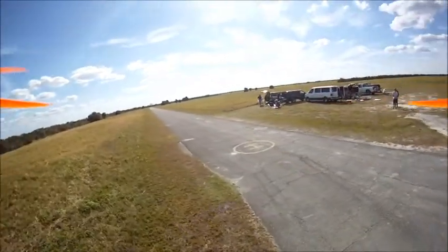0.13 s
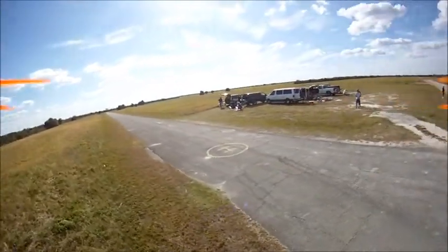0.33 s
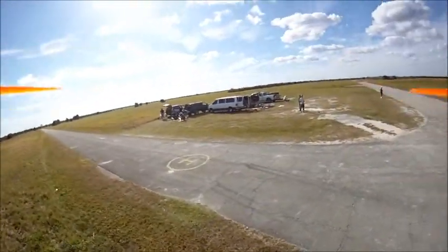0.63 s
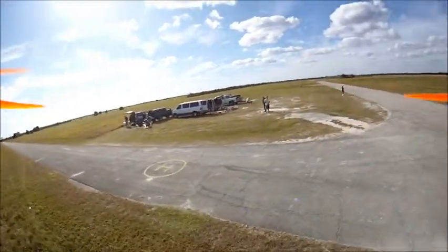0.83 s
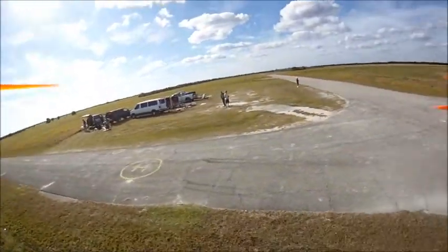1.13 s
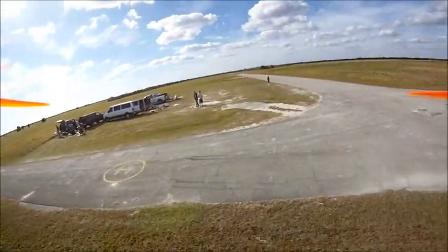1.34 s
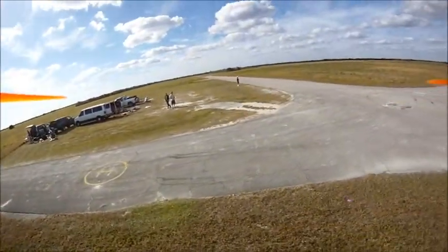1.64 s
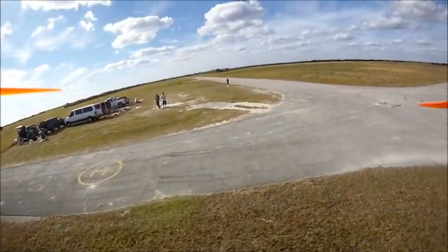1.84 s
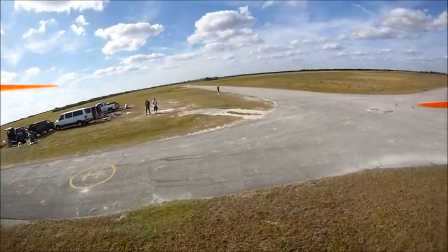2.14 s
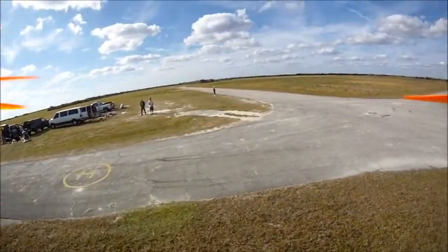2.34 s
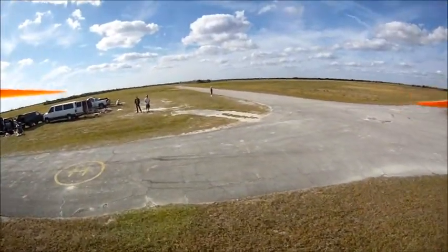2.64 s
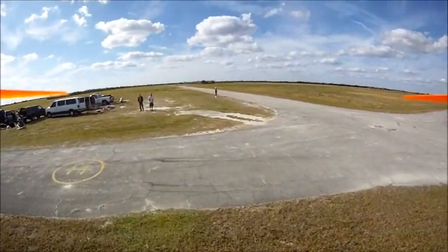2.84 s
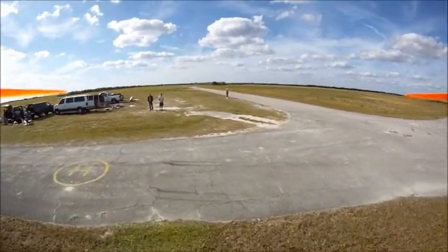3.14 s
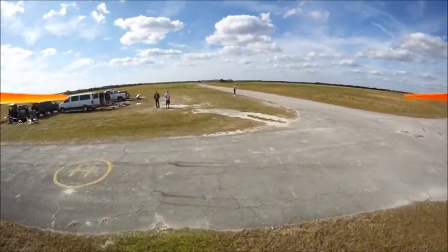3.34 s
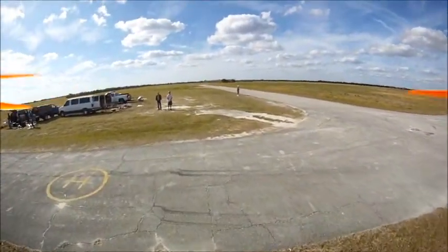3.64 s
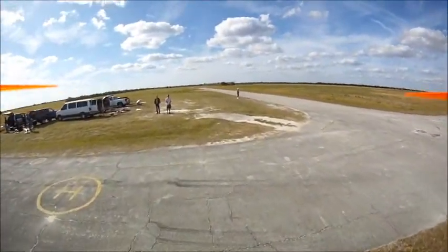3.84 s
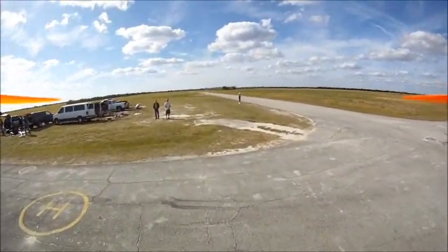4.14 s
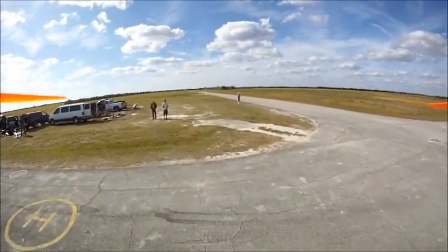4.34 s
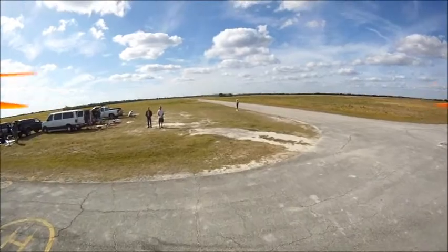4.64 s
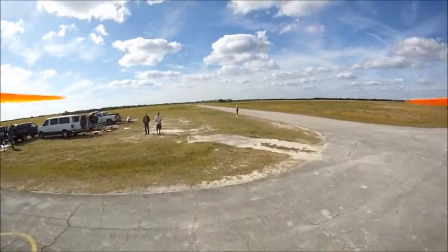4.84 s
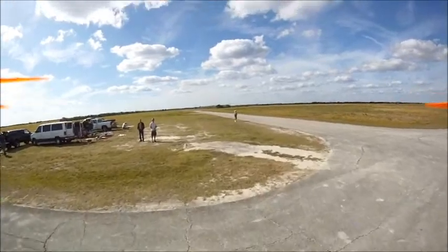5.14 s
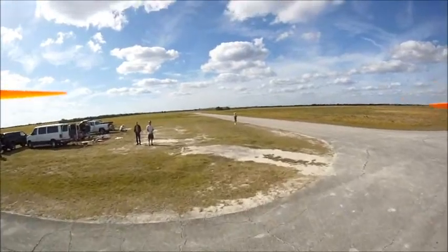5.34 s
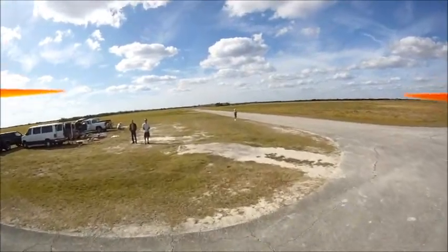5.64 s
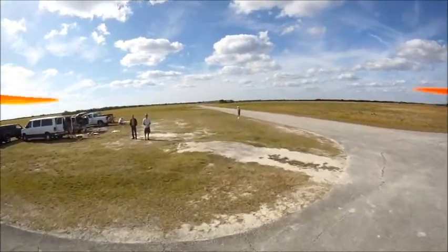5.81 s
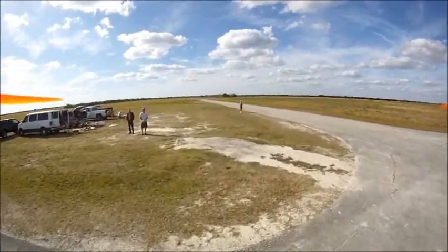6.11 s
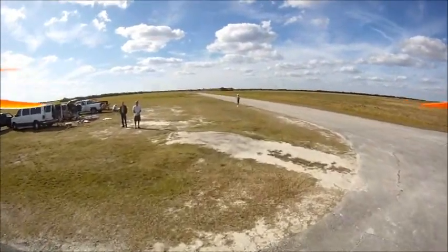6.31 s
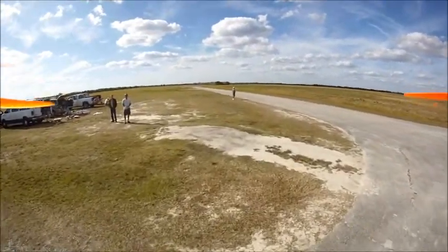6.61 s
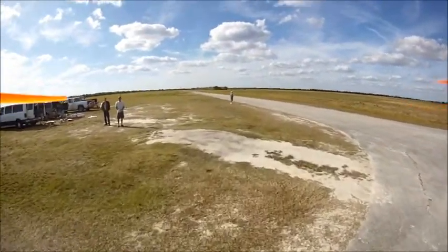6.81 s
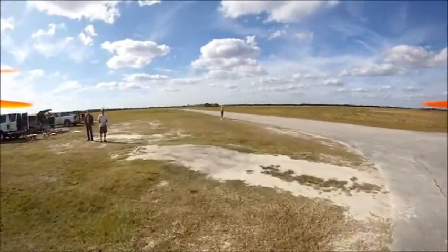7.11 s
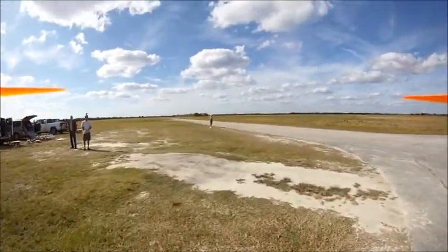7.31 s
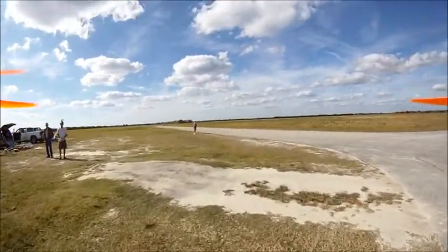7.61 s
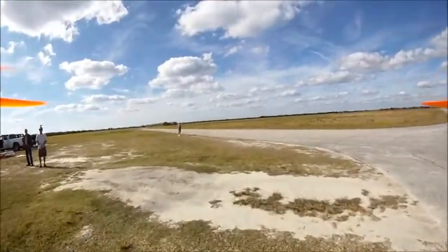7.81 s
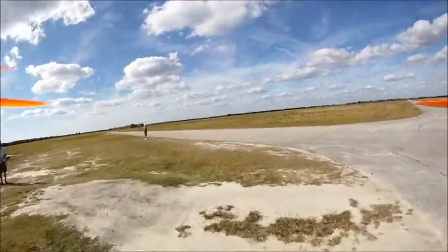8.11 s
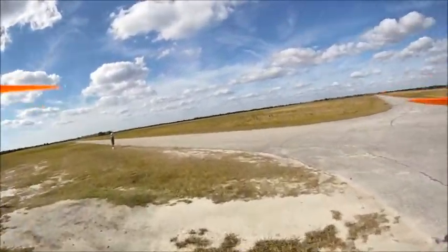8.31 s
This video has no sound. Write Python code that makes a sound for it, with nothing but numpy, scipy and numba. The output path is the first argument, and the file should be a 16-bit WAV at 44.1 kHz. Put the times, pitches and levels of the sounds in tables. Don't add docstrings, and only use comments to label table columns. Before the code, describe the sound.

Small drone rotors buzz and beat unevenly with a thin metallic whine and hiss, while wind gusts thump the microphone harder and harder.

```python
import sys
import numpy as np
from scipy import signal
from scipy.fft import rfft, irfft, next_fast_len
from scipy.io import wavfile
from scipy.ndimage import uniform_filter1d
from numba import njit

SR = 44100
rng = np.random.default_rng(int(sys.argv[2]) if len(sys.argv) > 2 else 0)


def level_to_linear(level):
    exponent = np.asarray(level, float) / 20
    return 10 ** exponent


def store_pcm(level_fs):
    pcm = np.round(np.clip(level_fs, -1, 1) * 32767).astype(np.int16)
    wavfile.write(sys.argv[1], SR, np.atleast_2d(pcm).T)


N = 373086
TIME = np.arange(N) / SR
SWITCH_HZ = 8000
CONVERTER_HZ, OUTPUT_HZ = 12000, 48000
TURN_S, TURN_LENGTH_S = 3.4, 0.2
EARLY_FAINT_DB = -5
PULL_UP_S, PULL_UP_LENGTH_S, EASED_DB = 7.77, 0.22, -2.5
RUMBLE_DB, RUMBLE_SLOPE, RUMBLE_LAG_S, CALM_DB = -36, 0.7, 0.46, -35.5
HISS_DB = -48.5

# (time [s], level [dB])
BREEZE = [(0.0, -52), (0.3, -46), (1.23, -45.5), (1.32, -26.5), (1.42, -41.5), (1.72, -39), (1.86, -33),
          (2.05, -40.5), (2.55, -32), (2.72, -40), (2.85, -27.5), (3.35, -30.5), (3.93, -32), (4.07, -36),
          (4.5, -29), (6.17, -32.5), (7.6, -30), (8.46, -28.5)]
# (time [s], length [s], change [dB])
GUSTS = [(1.45, 0.033, 3), (1.6, 0.12, 0.5), (2.663, 0.023, 8), (3.4, .04, 0), (3.9, 0.087, 1),
         (4.5, 0.14, 4), (4.9, 0.063, 2), (5.193, .08, 5), (5.995, 0.15, 6), (6.45, 0.085, 1.5),
         (7.31, 0.091, 4), (8.106, 0.16, -3.5)]
# (frequency [Hz], level [dB])
RUMBLE_COLOUR = [(15, -33), (30, -24.5), (60, -5.5), (110, -5.5), (200, -9), (500, -54)]
# (frequency [Hz], level [dB])
BURST_COLOUR = [(40, -1), (100, -1), (180, 1.5), (300, 1), (480, -5.5), (800, -15.5), (1500, -25.5),
                (3000, -42)]
# (time [s], push 1 or pull -1, peak [dB], frequency [Hz])
THUMPS = [(1.327, -1.0, -16, 427), (1.437, 1.0, -13, 178), (1.538, -1.0, -8, 131), (1.799, 1.0, -4.5, 233),
          (1.866, -1.0, -12.5, 210), (2.643, 1.0, -21, 276), (2.923, 1.0, -13, 229), (3.237, 1.0, -8, 198),
          (3.4, -1.0, -4.5, 174), (3.487, -1.0, -9, 255), (3.555, -1.0, -11, 207), (3.811, -1.0, -12, 252),
          (4.005, -1.0, -6, 125), (4.382, -1.0, 2.5, 126), (4.817, 1.0, -7, 187), (4.944, -1.0, -2, 242),
          (5.031, -1.0, -3, 119), (5.2, 1.0, -7.5, 136), (5.587, 1.0, -9, 189), (5.805, 1.0, -6, 200),
          (5.981, -1.0, -5, 210), (6.213, -1.0, -12, 135), (6.691, 1.0, -12, 215), (6.888, 1.0, -5.5, 267),
          (7.254, -1.0, -7, 215), (7.385, 1.0, -8.5, 304), (7.542, 1.0, -10, 213), (7.842, 1.0, -13, 252),
          (8.032, 1.0, -9.5, 134)]
# (time [s], length [s], change [dB])
BITES = [(0.0, 0.024, 2), (0.403, 0.57, 0), (1.42, 0.049, 4.5), (3.86, 0.18, 4.5), (4.233, 0.043, 3.5),
         (4.76, 0.33, 3), (7.0, 0.95, 4.5), (7.657, 0.19, 1.5), (2.707, 0.071, -2.5), (5.302, .3, 3),
         (6.756, 0.18, -2.5)]
# (frequency [Hz], level [dB])
FRAME_COLOUR = [(290, -31), (500, 1), (543, -7.5), (596, -4.5), (771, -8), (1180, -1), (1350, -4.5),
                (1530, -6.5), (1760, -11.5), (3080, -9), (4420, -2.5), (5050, -8.5), (5900, -19.5),
                (7670, -74), (13000, -120)]
# (frequency [Hz], width [Hz], lift [dB])
FRAME_RINGS = [(845, 12, 3.5), (1173, 90, 5), (1491, 102, 8.5), (3500, 50, 1.5), (4590, 1900, 4),
               (4820, 91, 3)]
FAINT_TONES = [(0, 11), (0, 12), (0, 14), (0, 18), (0, 28), (0, 36), (0, 42), (0, 56), (1, -28), (1, -56)]
# (near [dB], slow [dB], far [dB])
FAINT_DB = [(-16, -8.5, 5), (-33, -3, -13), (-3, -7, 0), (-21, -34, -5), (-23, -6, -10), (-7.5, -5.5, -15),
            (-37, -8, -31), (-6, -27, -11), (1, -26, -18), (-33, -9.5, -6)]
STRONG_TONES = [
    (0, 0, 42),
    (2, 0, 56),
    (0, 1, -42),
    (0, 0, 13),
    (1, 1, -42),
    (2, 0, 42),
]
# (level off resonance [dB], frequency [Hz], width [Hz], lift [dB], change before the turn [dB])
MOUNT_RINGS = [(-67.5, 3397, 830, 20.5, 2.5), (-68.5, 5110, 380, 9.5, 14.5), (-67.5, 4440, 660, 23.5, 1.5),
               (-57.5, 1165, 24, 5, 1.5), (-55.5, 4700, 400, 8.5, 0.5), (-63, 3730, 360, 10, -14)]
# (time [s], speed [Hz])
NEAR_SPEED = [(0.0, 91.8), (0.15, 89.8), (1.05, 89.7), (2.3, 89.8), (2.68, 93.1), (2.86, 93), (3.0, 90.9),
              (3.57, 84.9), (4.05, 87.9), (4.28, 86.5), (4.62, 83), (5.3, 83.6), (5.88, 86.2), (6.13, 80.6),
              (6.85, 81), (7.38, 81.9), (7.56, 86.4), (8.46, 83.3)]
# (time [s], speed [Hz])
SLOW_SPEED = [(0.0, 86.2), (0.23, 83.4), (0.57, 82.8), (0.8, 78.8), (1.1, 74.5), (1.72, 72.6), (2.07, 79.3),
              (2.4, 82.2), (2.85, 76.7), (3.07, 76.6), (3.5, 83), (4.33, 81.2), (4.65, 76.4), (5.52, 77.3),
              (5.85, 71.8), (6.8, 71.7), (7.8, 81), (8.4, 71.8)]
# (time [s], speed [Hz])
FAR_SPEED = [(0.0, 92), (0.15, 89.9), (0.7, 88.1), (1.5, 88.2), (1.6, 89.6), (2.3, 89.8), (2.68, 93.1),
             (2.86, 93), (3.35, 88), (3.85, 91), (4.2, 90.8), (4.42, 86.5), (4.62, 89.8), (5.55, 89.6),
             (5.72, 85.6), (6.9, 85.5), (7.45, 87.5), (7.8, 92.5)]
# (time [s], length [s], near [Hz], slow [Hz], far [Hz])
TRIMS = [(0.8, .17, -4.7, 0, 0), (0.93, .06, 0, 1.1, 0), (1.1, .1, 0, 0, 2.4), (1.39, .12, -7.8, 7.6, .8),
         (1.8, .06, .6, -1, 1.7), (2.23, .07, 0, -1.2, 0), (2.6, .08, 0, 1.4, 0), (3.68, .06, .9, -.6, 0),
         (4.07, .09, 0, -2.6, 0), (4.43, .09, -5.9, -.7, 0), (5.02, .06, -.8, -1, 0),
         (5.14, .06, 1.4, 1.4, -1.2), (5.3, .08, -.3, -1.2, 0), (5.47, .04, .4, 0, -.7),
         (5.88, .05, .3, .3, .7), (6.16, .08, -.4, 2.3, .3), (6.26, .06, .9, .5, -1.4),
         (6.42, .08, 1, -1.4, .9), (6.57, .06, .9, -.6, -1), (7.08, .13, -5.2, 2.8, 5),
         (7.37, .09, 0, -2.8, 0), (5.69, .05, .8, 0, 0), (7.95, .13, -.3, 2.4, 0), (8.06, .09, -2.6, 0, 0)]
ROTOR_ORDERS = [1, 2, 3, 4, 6, 8]
# (near [dB], slow [dB], far [dB])
ROTOR_DB = [
    (-14.5, -14.5, -6),
    (0, -1.5, 3),
    (-30, -32, -25),
    (-7, -13.5, -11),
    (-19, -32, -15),
    (-41.5, -37, -27),
]
FLUTTER_DB = [5.0, .8, 3.0, 1.2, 2.5, 3.0]
# (near [dB], slow [dB], far [dB])
LOAD_DB = [
    (-24.5, -29.5, -41),
    (-24.5, -28.5, -35.5),
    (-25.5, -37, -29),
]


def level(x, db):
    return x * level_to_linear(db) / np.sqrt(np.mean(x ** 2))


def curves(table):
    s, *columns = np.transpose(table)
    return np.array([np.interp(TIME, s, column) for column in columns])


def bumps(s, length_s):
    return np.exp(-((TIME - s) / length_s) ** 2)


def hump(hz, ring_hz, width_hz, lift_db):
    return lift_db / (1 + (2 * (hz - ring_hz) / width_hz) ** 2)


def colour(x, points, rings=()):
    size = next_fast_len(N)
    hz = np.arange(1, size // 2 + 2) * SR / size
    points_hz, points_db = np.transpose(points)
    db = np.interp(np.log(hz), np.log(points_hz), points_db)
    for ring in rings:
        db = db + hump(hz, *ring)
    return irfft(rfft(x, size) * level_to_linear(db), size)[:N]


def walk(rate_hz):
    hold = int(SR / rate_hz)
    draws = rng.standard_normal(400)
    held = np.repeat(draws[np.arange(N // hold + 1) % 400], hold)
    return 1.3 * uniform_filter1d(uniform_filter1d(held, hold), hold)[:N]


def wind(wind_db, rumble_db, eddy_db=1.5, burst_db=3.2, rumble_share=0.4):
    eddies_db = eddy_db * walk(11) + burst_db * walk(50)
    rumble = colour(level_to_linear(rumble_share * eddies_db) * rng.standard_normal(N), RUMBLE_COLOUR)
    bursts = colour(level_to_linear(eddies_db) * rng.standard_normal(N), BURST_COLOUR)
    return level_to_linear(rumble_db) * level(rumble, 3.96) + level_to_linear(wind_db) * level(bursts, 4.6)


def thumps(width_cycles=0.3, crackle_db=-12):
    out = np.zeros(N)
    crackle = colour(rng.standard_normal(N), [(200, 1.5), (600, -1.0), (1100, -16.5), (2500, -28)])
    ragged = level(crackle, crackle_db)
    around = np.arange(-800, 800)
    for s, push, db, hz in THUMPS:
        cycles = around / SR * hz
        at = np.clip(int(s * SR) + around, 0, N - 1)
        swing = np.sign(push) * np.cos(2 * np.pi * cycles) + ragged[at]
        out[at] += level_to_linear(db) * np.exp(-(cycles / width_cycles) ** 2) * swing
    return out


def hiss(turns, depth=0.15, patchy_db=0.5):
    near_pulse = depth * np.cos(4 * np.pi * turns[0])
    slow_pulse = 0.5 * depth * np.cos(4 * np.pi * turns[1])
    gate = 1 + near_pulse + slow_pulse
    return level(gate * level_to_linear(patchy_db * walk(30)) * rng.standard_normal(N), 10.6)


def whine(share, order, turns, runout=0.25):
    throb = 1 + runout * np.cos(2 * np.pi * turns + order)
    cycles = share * SWITCH_HZ * TIME + order * turns
    return throb * np.cos(2 * np.pi * cycles + 0.5 * walk(40))


def faint_tones(turns, far_db, wander_db=2.0, flicker_db=3.0):
    presence_db = [0, 0, far_db - 2]
    tones = 0
    for (share, order), db in zip(FAINT_TONES, FAINT_DB):
        for k in range(3):
            tone_db = db[k] + presence_db[k] + wander_db * walk(2.8) + flicker_db * walk(22)
            tones = tones + level_to_linear(tone_db) * whine(share, order, turns[k])
    return colour(tones, [(100, -16.0), (9000, -8.5)], FRAME_RINGS)


def frame(turns, before_turn):
    hiss_db = HISS_DB + sum(db * bumps(s, length_s) for s, length_s, db in BITES)
    shaken = faint_tones(turns, EARLY_FAINT_DB * before_turn) + hiss(turns)
    return level_to_linear(hiss_db) * level(colour(shaken, FRAME_COLOUR, FRAME_RINGS), 12.7)


def strong_tones(turns, speeds, before_turn, gain_db=8.0, wander_db=0.3):
    flicker_db = [1.5, 1.5, 1, 4, 2, 3]
    out = 0
    for (k, share, order), mount, flicker in zip(STRONG_TONES, MOUNT_RINGS, flicker_db):
        db, ring_hz, width_hz, lift_db, early_db = mount
        hz = share * SWITCH_HZ + order * speeds[k]
        db = db + hump(hz, ring_hz, width_hz, lift_db) + early_db * before_turn
        tone_db = db + gain_db + wander_db * walk(5) + flicker * walk(20)
        out = out + level_to_linear(tone_db) * whine(share, order, turns[k])
    return out


def rotors(turns, load_db):
    out = 0
    for order, db, flutter_db in zip(ROTOR_ORDERS, ROTOR_DB, FLUTTER_DB):
        for k in range(3):
            tone = np.cos(2 * np.pi * order * turns[k] + 0.3 * flutter_db * walk(15))
            out = out + level_to_linear(db[k] + load_db[k] + 3.5 + flutter_db * walk(9)) * tone
    return out


def shaft_speeds():
    speeds = np.vstack([curves(NEAR_SPEED), curves(SLOW_SPEED), curves(FAR_SPEED)])
    return speeds + sum(np.outer(hz, bumps(s, length_s)) for s, length_s, *hz in TRIMS)


def scene():
    speeds = shaft_speeds()
    turns = np.cumsum(speeds, axis=1) / SR + rng.uniform(size=(3, 1))
    before_turn = 0.5 - 0.5 * np.tanh((TIME - TURN_S) / TURN_LENGTH_S)
    pulled_up = 0.5 + 0.5 * np.tanh((TIME - PULL_UP_S) / PULL_UP_LENGTH_S)
    stages = np.array([before_turn, 1 - before_turn - pulled_up, pulled_up])
    load_db = np.transpose(LOAD_DB) @ stages

    wind_db = curves(BREEZE)[0] + sum(db * bumps(s, length_s) for s, length_s, db in GUSTS)
    average_db = uniform_filter1d(wind_db, int(RUMBLE_LAG_S * SR))
    rumble_db = RUMBLE_DB + RUMBLE_SLOPE * (average_db - CALM_DB)

    weather = wind(wind_db, rumble_db) + thumps()
    motors = level_to_linear(EASED_DB * pulled_up) * strong_tones(turns, speeds, before_turn)
    sound = weather + frame(turns, before_turn) + motors + rotors(turns, load_db)
    return sound[None]


@njit
def ride(x, attack, release, top, ratio):
    y, envelope = np.empty(len(x)), top
    for i in range(len(x)):
        y[i] = x[i] * (top / envelope) ** (1 - 1 / ratio)
        rate = attack if abs(x[i]) > envelope else release
        envelope += (abs(x[i]) - envelope) * rate
    return y


def slow_converter(x):
    slow = signal.resample_poly(x, CONVERTER_HZ // 300, SR // 300)
    steps = np.repeat(slow, OUTPUT_HZ // CONVERTER_HZ)
    return signal.resample_poly(steps, SR // 300, OUTPUT_HZ // 300)[:N]


def low_pass(x):
    return signal.sosfilt(signal.butter(12, 15480, fs=SR, output="sos"), x)


def record(dry):
    attack_s, release_s = 0.0019, 0.07
    held = ride(dry[0], 1 / (attack_s * SR), 1 / (release_s * SR), 0.15, 3.2)
    held = 0.62 * np.tanh(held / 0.62)
    out = colour(slow_converter(held), [(15250, 0), (15400, -70)])
    return low_pass(out[None])


dry = scene()
out = record(dry)
store_pcm(out)
```